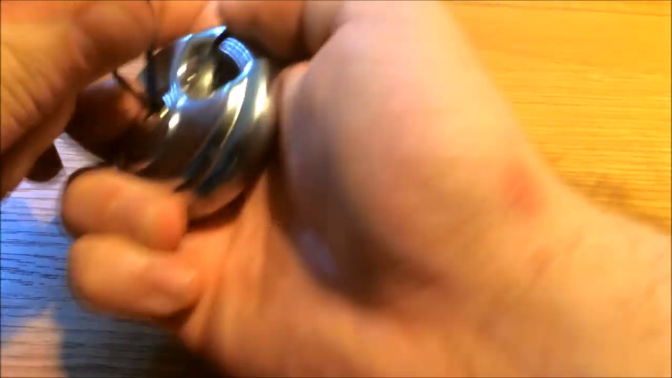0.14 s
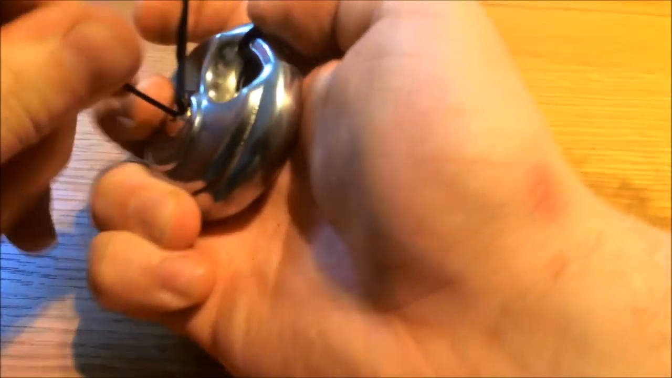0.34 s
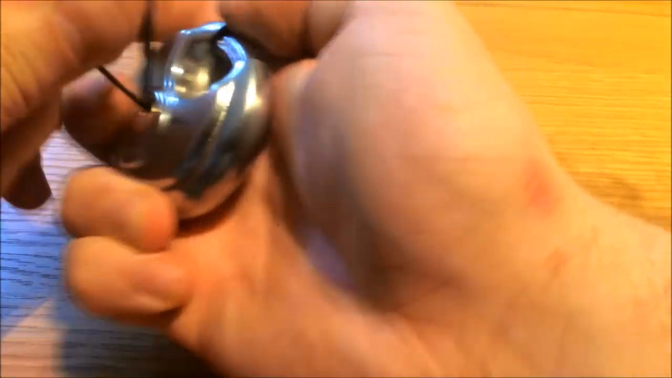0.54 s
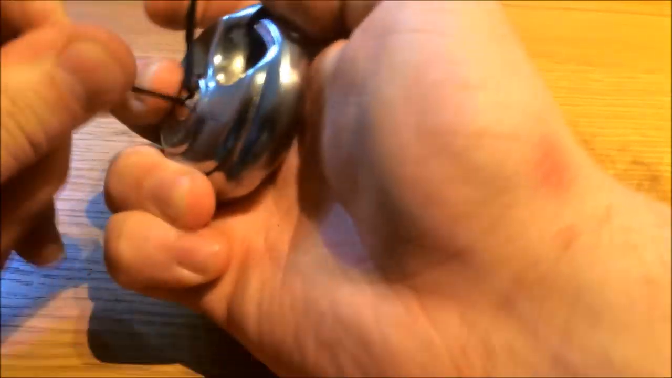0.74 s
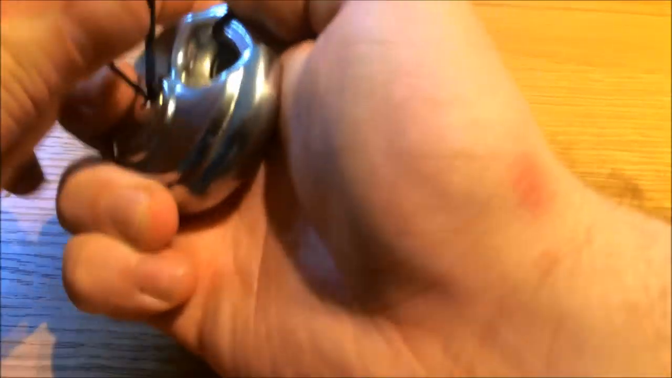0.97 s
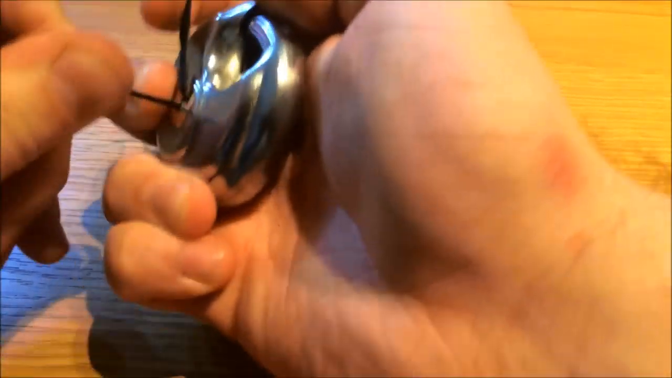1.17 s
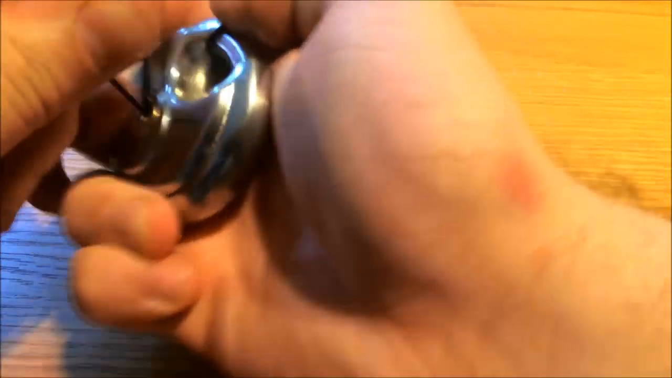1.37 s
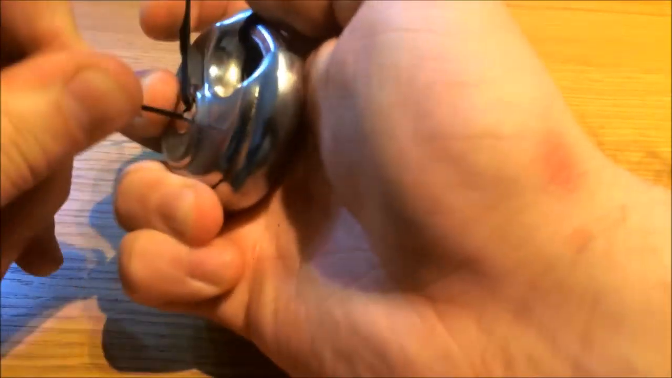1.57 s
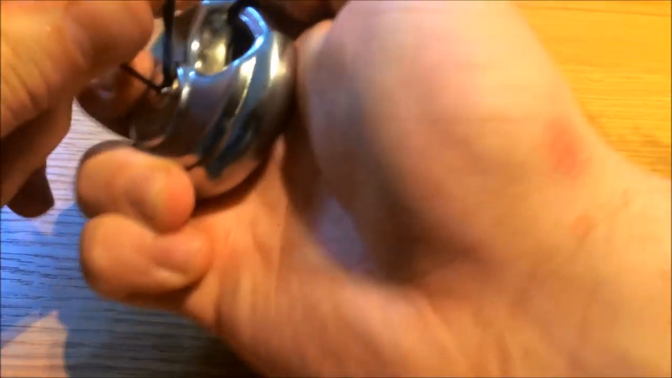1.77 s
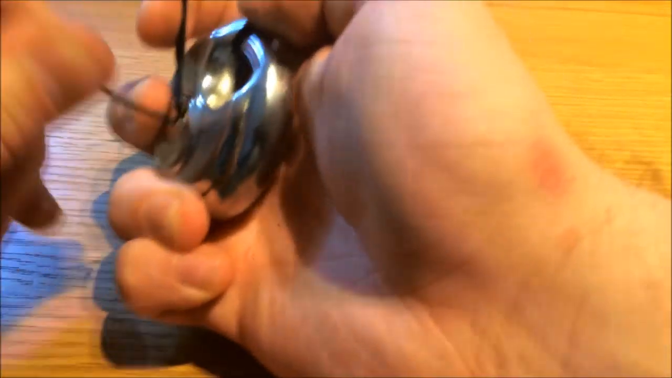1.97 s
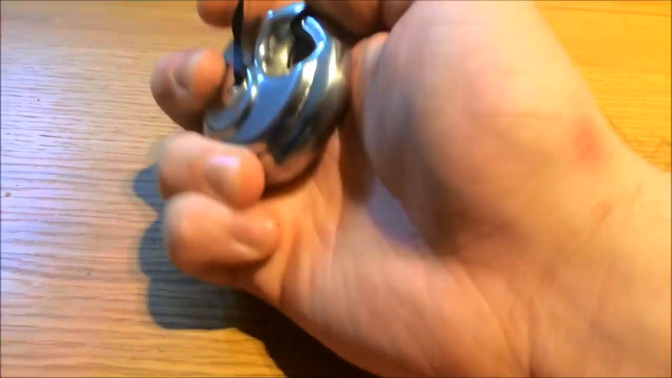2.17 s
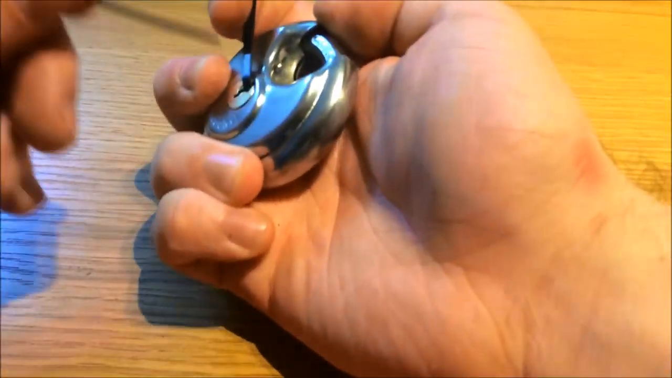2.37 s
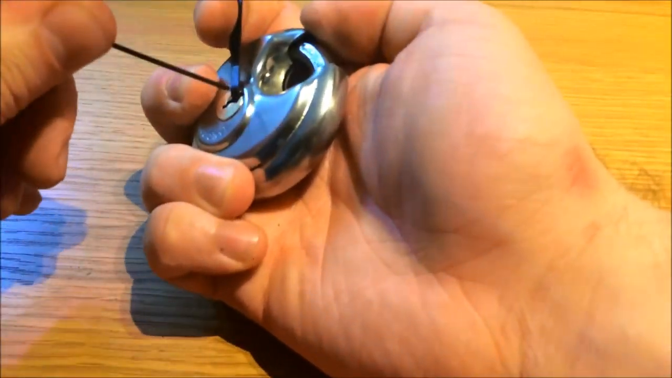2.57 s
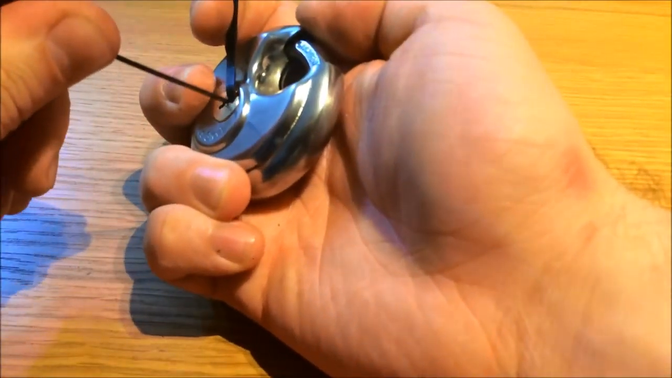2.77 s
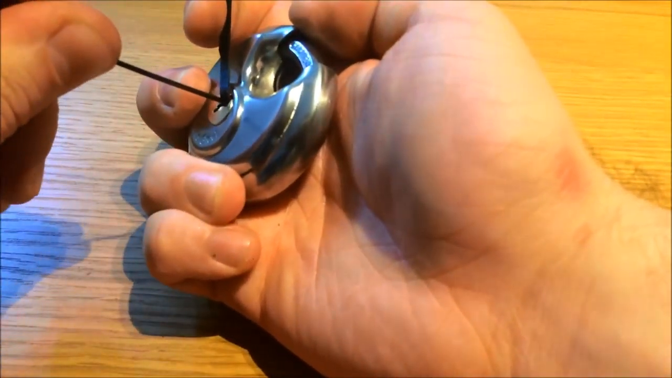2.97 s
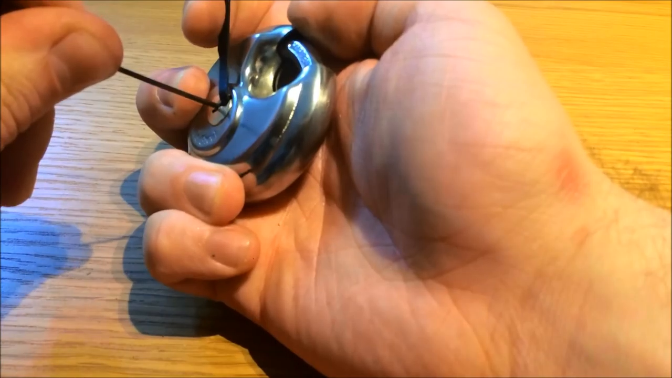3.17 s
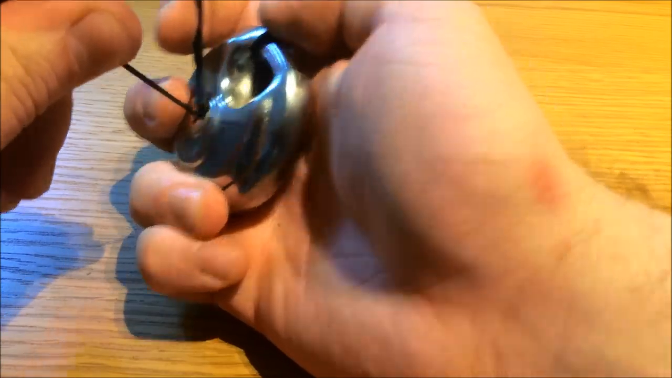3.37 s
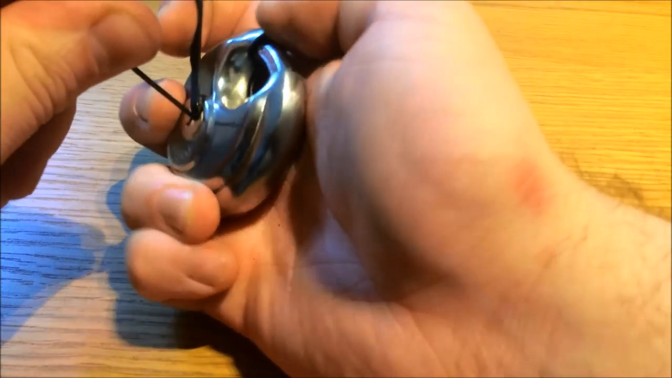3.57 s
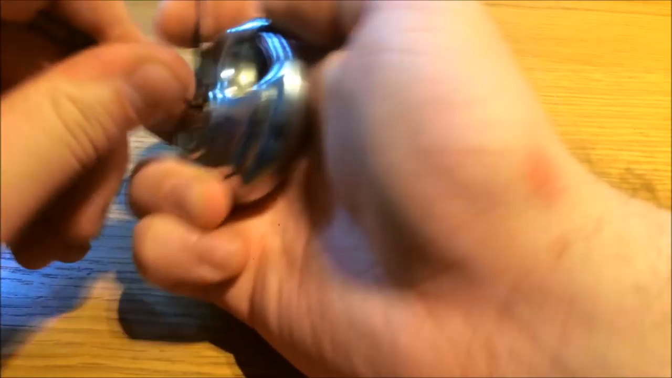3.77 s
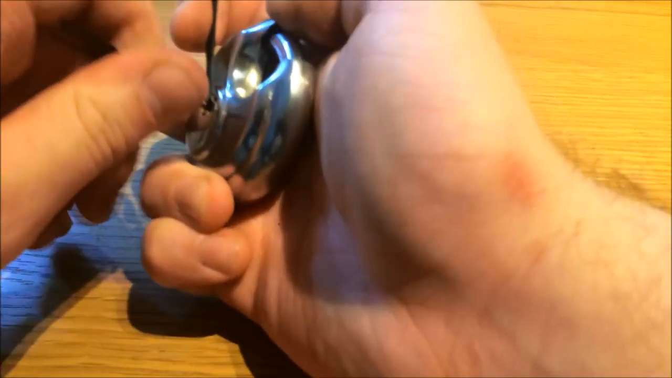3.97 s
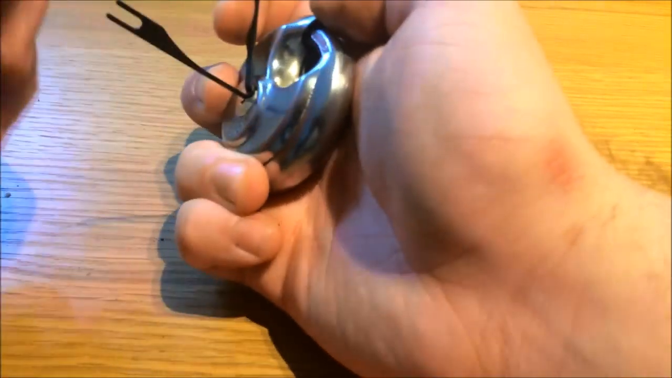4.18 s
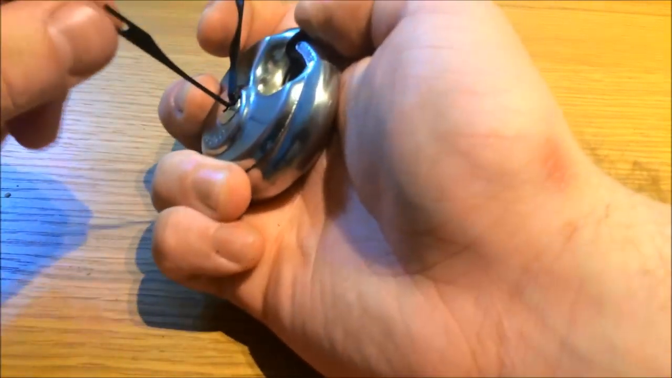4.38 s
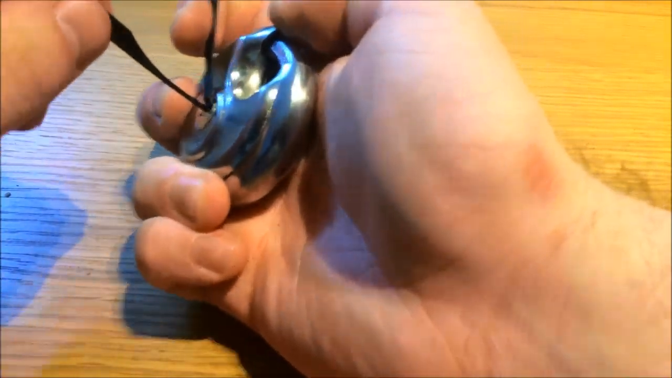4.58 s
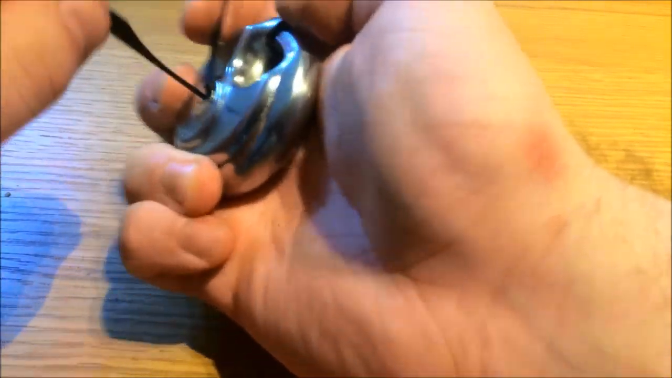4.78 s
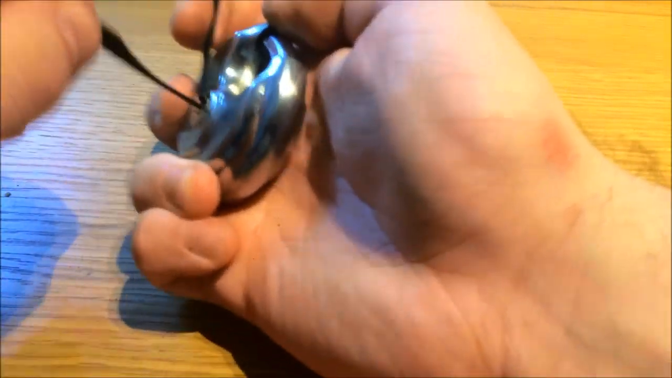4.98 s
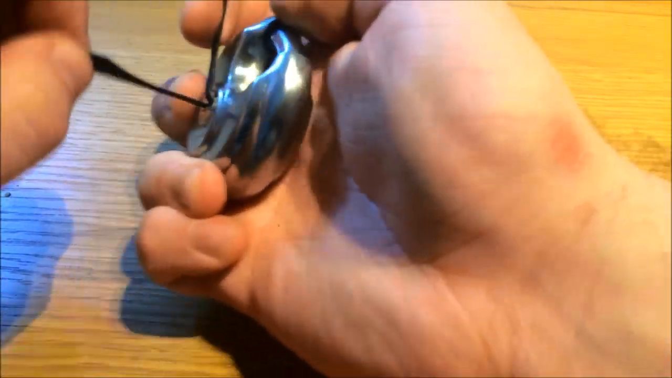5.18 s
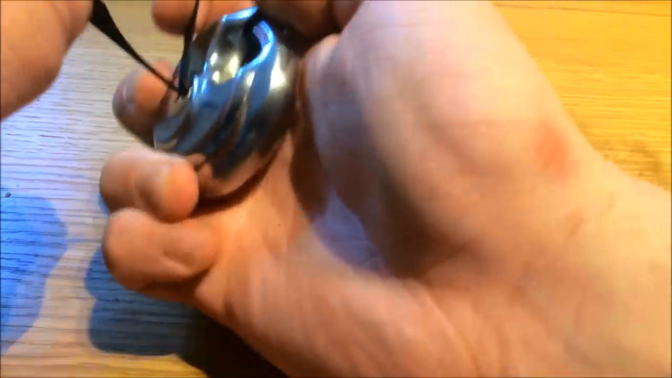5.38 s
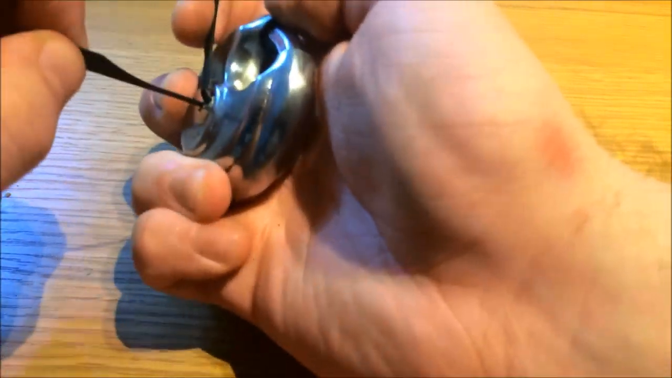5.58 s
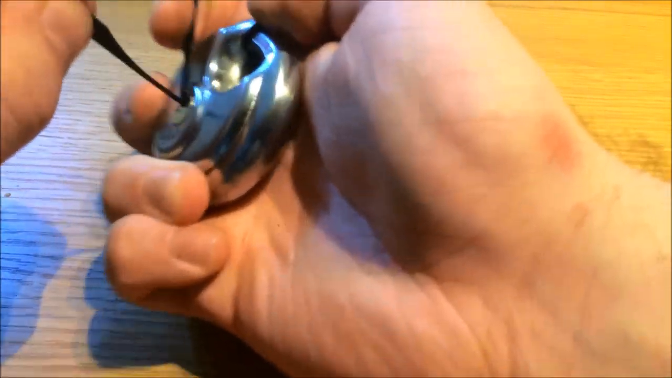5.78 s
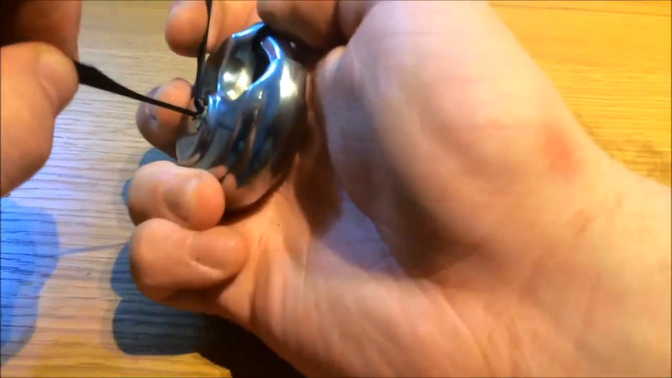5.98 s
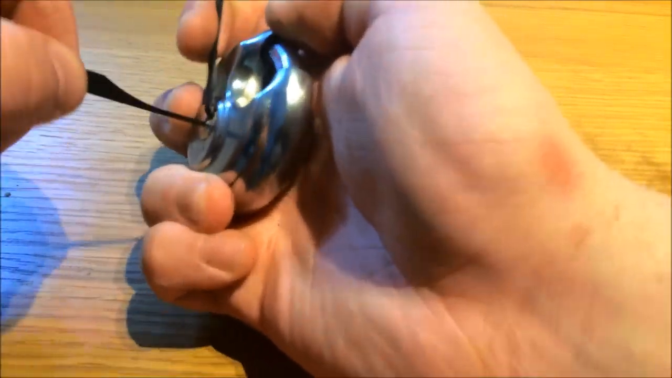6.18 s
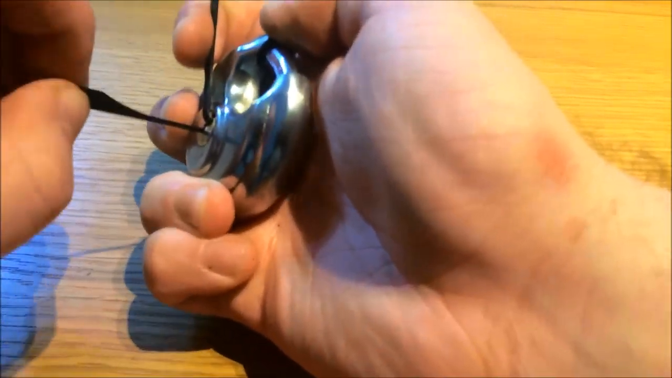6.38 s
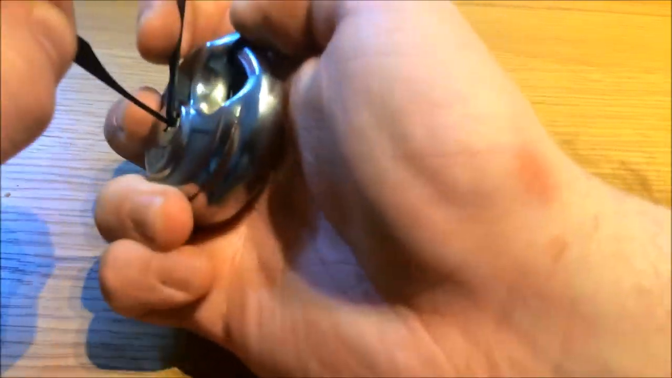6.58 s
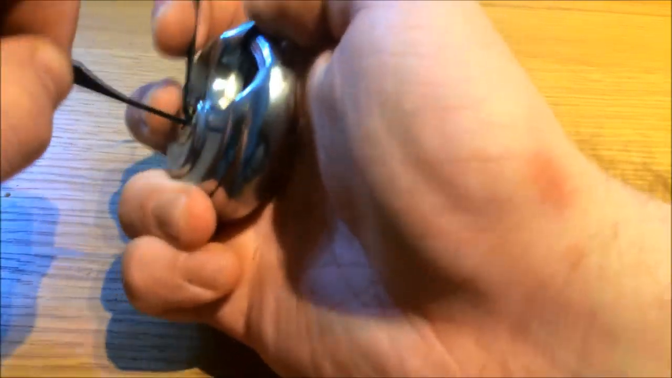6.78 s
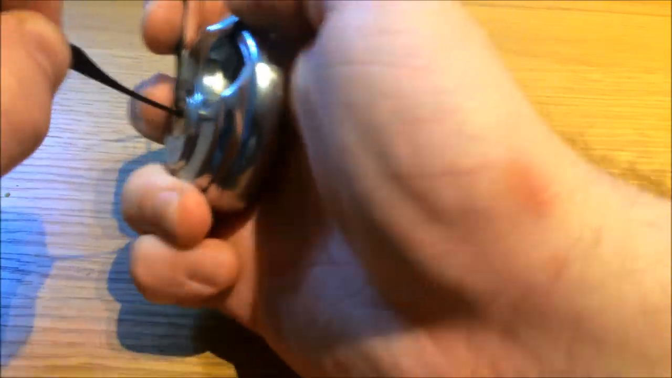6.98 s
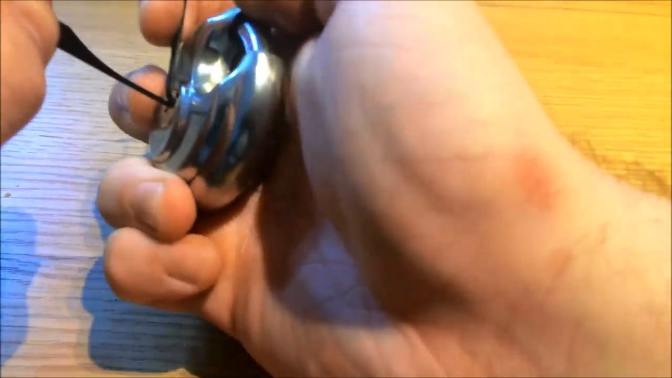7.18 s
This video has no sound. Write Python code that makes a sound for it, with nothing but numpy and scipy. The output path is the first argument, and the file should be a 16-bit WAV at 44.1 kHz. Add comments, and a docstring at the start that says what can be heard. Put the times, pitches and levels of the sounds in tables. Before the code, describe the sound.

A thin metal pick works inside a steel padlock held in the hand: irregular tiny clicks, brief scrapes and occasional sharp snaps in a quiet room.

```python
"""In a small quiet room, a pick and a tension wrench work in a steel padlock held in one hand over a table.
Pins click and the pick scrapes from the start: brief blows excite the lock's modes, which the hand damps in milliseconds.
From 0.9 s on the pick now and then slips off a pin, rebounds, chatters by stick and slip and jolts the hand.
Near 2.1 s and 4 s a tool is drawn out and its own narrow mode sings; soft bumps of the hands sound through the table.
The room answers with one wall echo and a diffuse decay, over faint rumble, drone and hiss."""
import sys
import numpy as np
from scipy import signal
from scipy.fft import rfft, irfft
from scipy.io import wavfile
from scipy.ndimage import uniform_filter1d

SR = 44100
rng = np.random.default_rng(int(sys.argv[2]) if len(sys.argv) > 2 else 0)


def dump_mix(stems):
    """Bounce the given channels to the path in sys.argv[1] as a 16-bit WAV at rate SR."""
    frames = np.atleast_2d(stems).T  # one column per channel
    limited = np.clip(frames, -1, 1)  # hard clip at full scale
    pcm = np.round(limited * 32767).astype(np.int16)
    wavfile.write(sys.argv[1], SR, pcm)


N = 319284
TAPS = 4096  # length of the filter design [samples]
HZ = np.fft.rfftfreq(TAPS, 1 / SR) + 1e-3  # its frequency axis [Hz], kept off zero

# resonances of the lock in the hand: (nominal frequency [Hz], width [Hz], relative level [dB])
LOCK_MODES = [(1141, 115, -1), (2100, 380, -4.5), (3210, 300, 1.5), (3810, 230, 4), (4187, 400, 4),
              (4813, 560, -2.5), (5902, 480, 2.5), (7205, 400, -3), (8760, 440, -1), (10100, 1200, -11),
              (10830, 290, -7), (11900, 520, -5), (14300, 2200, -11.5)]
# the pick slips off a pin and hits the keyway: (time [s], level over 4 ms [dB], knock at 1-2 kHz [dB],
# brightness at 12 kHz [dB], delay of the rebound [s], level of the rebound over 4 ms [dB],
# level of the jolt over 20 ms [dB])
SLIPS = [(0.945, -11, -3.5, 9.5, 0.013, -20, -47), (1.0861, -20.5, 0.5, 7, 0.018, -37.5, -69.5),
         (1.378, -15.0, -3.0, 2, 0.019, -24.5, -45), (1.7186, -15.0, 7.5, 4.5, 0.0166, -24, -42),
         (5.4231, -13.5, 3, 14.0, 0.014, -24.5, -51), (5.5126, -26, -0.5, 0.5, 0.0088, -33, -59),
         (6.2842, -15, 0.5, 5.5, 0.012, -24.5, -43), (6.6367, -24, 4.5, 9, 0.0081, -30.5, -53),
         (6.9898, -18.5, -2.5, 2, 0.015, -28.5, -52)]


def amp(db):
    """Level law: decibels to amplitude gain."""
    return 10 ** (np.asarray(db) / 20)


def read(points, hz):
    """Piecewise-linear spectrum over logarithmic frequency."""
    f, value = np.transpose(points)
    return np.interp(np.log(hz + 1), np.log(f + 1), value)


def add(mix, s, sound):
    """Superposition: adds a sound to the mix at time s, cut at the end of the mix."""
    part = mix[max(round(s * SR), 0):][:len(sound)]
    part += sound[:len(part)]


def levelled(x, db, seconds):
    """Energy scaling: gives x the energy of a steady sound of that level and length."""
    return x * amp(db) * np.sqrt(seconds * SR / np.sum(x ** 2))


def ring(drive, gain):
    """Minimum-phase filtering: the log gain over HZ fixes the phase of a causal response to the drive."""
    log_gain = np.log(np.maximum(gain, 1e-5))
    circle = np.r_[log_gain, log_gain[-2:0:-1]]
    spectrum = np.exp(np.conj(signal.hilbert(circle)))
    response = np.fft.ifft(spectrum).real
    return signal.fftconvolve(drive, response[:TAPS // 2])


def resonances(modes, shift=0., vary_db=0.):
    """Modal superposition: resonance curves add in power, each mode randomly detuned and favoured."""
    hz, width, db = np.transpose(modes)[:, :, None]
    detune, favour = rng.standard_normal((2, len(modes), 1))
    hz = hz * (1 + shift * detune)
    off_resonance = (HZ ** 2 - hz ** 2) / (HZ * width)
    power = amp(db + vary_db * favour) ** 2 / (1 + off_resonance ** 2)
    return np.sqrt(np.sum(power, 0))


def air(level_db=-63.5, drone_width_hz=6, waver_db=0.5):
    """Filtered noise with slow modulation: rumble and faint drone waver together over steady microphone hiss."""
    # still air of the room: (frequency [Hz], relative spectrum level [dB])
    air_spectrum = [(20, -15.5), (55, -5), (115, -11), (175, -1.5), (240, -10), (500, -16.5), (1500, -25.5),
                    (15000, -36)]
    # faint mechanical drone: (frequency [Hz], level [dB])
    drone_bands = [(58, -76), (144, -74.5)]
    hz = np.fft.rfftfreq(N, 1 / SR)
    layers = [(amp(read(air_spectrum, hz)), level_db)]
    layers += [(1 / (1 + ((hz - f) / drone_width_hz) ** 2), db) for f, db in drone_bands]
    still = np.zeros(N)
    for shape, db in layers:
        noise = irfft(rfft(rng.standard_normal(N)) * shape, N)
        still += levelled(noise, db, N / SR)
    rumble = irfft(rfft(still) / (1 + (hz / 700) ** 2), N)
    drift = irfft(rfft(rng.standard_normal(N)) * (hz < 6), N)
    wavering_gain = amp(waver_db * drift / drift.std())
    return still + rumble * (wavering_gain - 1)


def blow(first=.8, chatter_s=0.0019):
    """Impact of metal on metal: a first strike and decaying micro-bounces, white on the broad scale."""
    t = np.arange(TAPS // 8) / SR
    bounces = rng.standard_normal(len(t)) * np.exp(-t / chatter_s)
    drive = first * (t == 0) + bounces / np.linalg.norm(bounces)
    broad_power = uniform_filter1d(abs(rfft(drive, TAPS)) ** 2, size=130)
    return ring(drive, 1 / np.sqrt(broad_power))


def modes_at(s):
    """Freed resonator: the lock rings alone until a tool is drawn out, whose own mode then joins in."""
    # the thin tool singing: (nominal frequency [Hz], width [Hz], relative level [dB])
    tool_modes = [(3030, 61, 8)]
    # a tool is drawn out of the keyway, free to ring: (start [s], length [s])
    drawn_out = [(2.14, .17), (3.95, .12)]
    tool_is_free = any(start < s < start + length for start, length in drawn_out)
    return LOCK_MODES + tool_modes if tool_is_free else LOCK_MODES


def lock_gain(modes, vary_db=2.5, corner_hz=1020, bass_db=-5):
    """Small-source radiation: below its first mode the lock radiates less, down to a floor."""
    floor = amp(bass_db)
    radiation = floor + (1 - floor) / (1 + (corner_hz / HZ) ** 8)
    return resonances(modes, shift=.012, vary_db=vary_db) * radiation


def colour(db, knock_db, bright_db, shove=0.81, firm_db=-27, bass_share=0.63, mid_share=0.59):
    """Contact spectrum [dB] over HZ: brightness tilts the treble; a firm blow shoves the whole lock, adding bass."""
    bass_db = bass_share * knock_db + shove * max(db - firm_db, 0)
    points = [(750, bass_db), (1100, knock_db), (2000, knock_db), (3200, 0.00045), (4400, 0.016),
              (7000, mid_share * bright_db), (12000, bright_db)]
    return read(points, HZ)


def contact(s, db, colour_db=0., blur=2.5):
    """Directivity: one blow as sent to the microphone, and averaged over all directions, where notches fill in."""
    tone = amp(colour_db)
    near = ring(blow(), lock_gain(modes_at(s)) * tone)
    blurred = [(hz, blur * width, level) for hz, width, level in LOCK_MODES]
    around = ring(signal.unit_impulse(TAPS // 8), lock_gain(blurred) * tone)
    return levelled(near, db, .004), levelled(around, db, .004)


def touches(start, length, db, per_s, spread_db=2.0):
    """Random point process: light taps of the tip, most of them faint, as (time, level, knock, brightness)."""
    count = max(round(per_s * length), 1)
    draws = rng.random((64, 2))[:count]
    return [(start + when * length, db - spread_db * np.log(size + .05), 0, 0) for when, size in draws]


def pins(idle_db=-66, idle_per_s=4.5, probing_per_s=24, rebound_knock_db=-3, rebound_bright_db=2.5):
    """Impact excitation of damped modes: clicks, slips with their rebounds, and light touches."""
    # single contacts of pick and pins: (time [s], level over 4 ms [dB], knock at 1-2 kHz [dB],
    # brightness at 12 kHz [dB])
    clicks = [(0.052, -33, -14.0, 11), (0.0781, -31.5, 1.5, 8), (0.0917, -41, -2.0, -3.0),
              (0.1374, -31.5, -8.5, 2.0), (0.1805, -30.5, 2.0, 6.0), (0.2739, -39.5, 2, 3),
              (0.279, -29.0, -4.0, 4.5), (0.3079, -37.5, 9, 15), (0.53, -46.0, -6, 6.5),
              (0.5395, -26.5, -2, -1.0), (0.6415, -50.5, -0.5, 0), (0.7076, -50, 5, 1.0),
              (0.8785, -38, 6, 0.0), (0.8818, -36, -2, -1.5), (0.924, -29, -2.5, 2.5),
              (1.0568, -40.5, -3.0, -14.5), (1.1139, -36, -2.5, -4.5), (1.3209, -27.0, -5, -1.5),
              (1.3445, -28.5, 5.0, -11.5), (1.3707, -28.5, -2.5, -0.5), (1.422, -37.5, -5.5, -2),
              (1.5227, -36, 12.5, 9), (1.5765, -46.5, 24.5, -5), (1.658, -29.0, -4.0, -1),
              (1.707, -40.5, -4.5, -7), (1.7455, -24, -9, 1.0), (1.759, -36.5, -6, 0.0),
              (1.8739, -40, 5, 3), (1.8932, -34.5, -2.5, -3.5), (2.07, -23.5, 3.0, 6.5),
              (2.142, -45.5, 11, 19.5), (2.1888, -23, -0.5, 21.5), (2.203, -38, -1.0, 24),
              (2.216, -23.0, -4, 4), (2.2286, -22, -4.5, 1), (2.248, -22.0, -8, -9), (2.282, -27, -0.5, -3),
              (2.495, -38.5, -8, 9.5), (2.8066, -43.5, -9, -4.5), (2.869, -51.5, 2, 0.0),
              (2.8836, -49.5, 0.0, 7), (2.948, -49.5, 1.0, 8), (2.9882, -43, -3.5, 3.5),
              (3.0173, -45, -8, -1), (3.1463, -34.5, -7.5, -7.5), (3.167, -35.5, -4, -5.0),
              (3.2968, -42.5, 11, 16.5), (3.8241, -34.5, -8, -5.0), (3.842, -49.5, -3.0, -6.0),
              (3.8903, -48, 1, -14), (3.967, -40.5, -5.0, 17), (3.9891, -24.5, 0, -8),
              (3.9936, -24.5, -6, -2), (4.0043, -29, -3, -5.0), (4.0208, -30.0, 0, -15.5),
              (4.044, -21.5, -2, 6.5), (4.203, -37, 4, 16), (4.2093, -33.5, 0.5, 3.0),
              (4.5702, -45.5, -2.5, 4.5), (4.578, -48.5, 2.0, -2.5), (4.7714, -16, -9.0, 0.5),
              (5.026, -43.5, 3.0, -2), (5.1871, -37.5, -14.5, 11.5), (5.3388, -47.5, 2.5, -6),
              (5.3513, -34, -4.5, -17.5), (5.3822, -31.5, -1, 7.5), (5.391, -32.5, 0.5, 4.0),
              (5.4485, -24.0, -4.5, 4.5), (5.5607, -41, -4, -9.0), (5.673, -10.5, -5.5, 10.5),
              (5.8432, -32, -3.5, -12), (5.8614, -40, -7.5, 6), (5.883, -34, -2, -3),
              (6.0245, -29.0, -4.0, 8.5), (6.029, -35, -4.5, 2), (6.077, -28.5, -8, 3.5),
              (6.0861, -33.5, 8.5, 7.5), (6.6053, -42.5, 0.5, -15.5), (6.6861, -16.5, -5.5, 7.5),
              (6.9349, -25.0, -1, 2), (6.9433, -18, -5, 4.5), (7.229, -44.5, 12.5, -18)]
    # the tip feels its way among the pins: (start [s], length [s], base level of its touches [dB])
    probing = [(1.935, .13, -60), (4.961, .07, -56.5)]
    hits = list(clicks)
    for s, db, knock_db, bright_db, rebound_s, rebound_db, _ in SLIPS:
        hits.append((s, db, knock_db, bright_db))
        hits.append((s + rebound_s, rebound_db, rebound_knock_db, rebound_bright_db))
    for start, length, db in probing:
        hits += touches(start, length, db, probing_per_s)
    hits += touches(0, N / SR, idle_db, idle_per_s)
    near, around = np.zeros((2, N))
    for s, db, knock_db, bright_db in hits:
        to_microphone, to_room = contact(s, db, colour(db, knock_db, bright_db))
        add(near, s, to_microphone)
        add(around, s, to_room)
    return near, around


def room(x, first_s=0.004, wall_s=.0135, wall_db=-25):
    """Reverberation: one echo from the nearest wall and a diffuse tail, each band decaying at its own rate."""
    # decay of the room: (frequency [Hz], time to fall by 60 dB [s])
    decay_times = [(150, 0.0008), (1000, 0.24), (4000, 0.32), (8000, 0.29), (15000, 0.21)]
    # strength of the diffuse answer: (frequency [Hz], gain [dB])
    tail_gains = [(150, -6.5), (1100, -14.5), (2100, -12.5), (3200, -20.5), (4200, -15.5), (5400, -21.5),
                  (7200, -17), (9300, -20.5), (12000, -22.5), (15000, -17)]
    hz, t, noise = signal.stft(rng.standard_normal(SR // 2), SR, nperseg=256)
    t60 = read(decay_times, hz)[:, None]
    unit_energy = np.sqrt(2 * np.log(1000) / (t60 * SR))
    gain = amp(read(tail_gains, hz))[:, None] * unit_energy
    decay = np.exp(-np.log(1000) * t / t60)
    tail = signal.istft(noise * gain * decay, SR, nperseg=256)[1]
    out = np.zeros(N)
    add(out, first_s, signal.fftconvolve(x, tail))
    add(out, wall_s, amp(wall_db) * x)
    return out


def scrapes(slips_per_s=1100, spread_db=3, fade_db=6, tilt_db=-1.8, pivot_hz=5000):
    """Stick and slip friction: a dense run of tiny blows that eases off as the pick comes free."""
    # the pick dragging over pins and wards: (start [s], length [s], level [dB])
    drags = [(0.085, .043, -59), (0.882, .04, -57), (2.147, 0.038, -48.5), (2.184, 0.027, -43.5),
             (2.229, .014, -30.5), (2.248, .011, -29), (2.851, 0.1706, -71.5), (3.957, .035, -50),
             (3.993, .037, -42.5), (4.04, 0.013, -36.5), (5.368, 0.0541, -57), (6.736, 0.014, -31)]
    # after a slip the pick chatters to rest: start and length in rebound delays, level against the rebound
    after, lasts, chatter_db = .8, 1.45, -8
    chatter = [(s + after * rebound_s, lasts * rebound_s, rebound_db + chatter_db)
               for s, *_, rebound_s, rebound_db, _ in SLIPS]
    tilt = amp(tilt_db * np.log2(np.maximum(HZ / pivot_hz, .2)))  # tilt_db per octave
    out = np.zeros(N)
    for s, length, db in drags + chatter:
        samples = int(np.clip(length * SR, 20, 2 * TAPS))
        chance, size = rng.random((2, 2 * TAPS))[:, :samples]
        slips = (chance < slips_per_s / SR) | (chance == chance.min())  # at least one
        easing_db = fade_db * np.linspace(0, 1, samples)
        force = slips * amp(-spread_db * np.log(size + .03) - easing_db)
        drive = signal.fftconvolve(force, blow())
        rung = ring(drive, lock_gain(modes_at(s)) * tilt)
        add(out, s, levelled(rung, db, length))
    return out


def push(db, edge_hz, fade_s=.003, rattle=.031):
    """Soft impact on the table's modes: each push is rounded off above its own upper edge."""
    # resonances of the table: (frequency [Hz], width [Hz], relative level [dB])
    table_modes = [(59.7, 22, -9), (134, 42, -2), (197.67, 65, -5.5), (460, 590, -13)]
    t = np.arange(TAPS) / SR
    drive = (t == 0) + rattle * rng.standard_normal(len(t)) * np.exp(-t / fade_s)
    rounding = 1 / np.sqrt(1 + (HZ / edge_hz) ** 8)
    return levelled(ring(drive, resonances(table_modes) * rounding), db, .02)


def thuds(jolt_hz=427, settle_s=.018, settle_db=-5, settle_hz=165, settle_fade_s=.026):
    """Structure-borne sound: bumps and the jolts of the slips, each followed by a low rumble as the hand settles."""
    # soft bumps of the hands, heard through the table: (time [s], level over 20 ms [dB], upper edge [Hz])
    bumps = [(2.218, -49.5, 219), (2.252, -45.5, 160), (4.231, -52, 1100), (4.25, -56, 800),
             (6.244, -36, 395)]
    jolts = [(s, jolt_db, jolt_hz) for s, *_, jolt_db in SLIPS]
    out = np.zeros(N)
    for s, db, edge_hz in bumps + jolts:
        add(out, s, push(db, edge_hz))
        add(out, s + settle_s, push(db + settle_db, settle_hz, settle_fade_s, rattle=0.28))
    return out


def scene():
    """Direct and reverberant field: the lock close to the microphone, the room behind it."""
    near, around = pins()
    handling = scrapes() + thuds()
    direct = near + handling
    return (direct + room(around + handling) + air())[None]


def record(dry):
    """Clipping and band limit: the sharpest snaps overload the microphone, then a low-pass cuts the top."""
    low_pass = signal.firwin(255, 15220, window=("kaiser", 8), fs=SR)  # edge in Hz
    overloaded = np.clip(dry, -.88, .88)
    return signal.oaconvolve(overloaded, low_pass[None], "same")


dry = scene()
out = record(dry)
dump_mix(out)
```